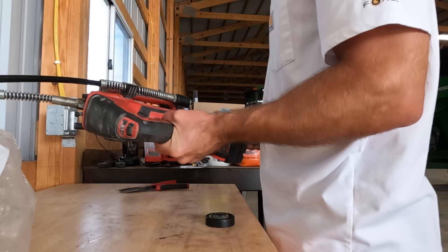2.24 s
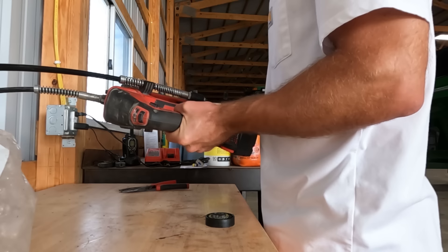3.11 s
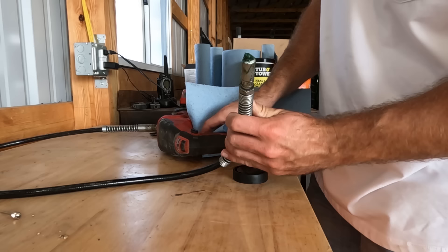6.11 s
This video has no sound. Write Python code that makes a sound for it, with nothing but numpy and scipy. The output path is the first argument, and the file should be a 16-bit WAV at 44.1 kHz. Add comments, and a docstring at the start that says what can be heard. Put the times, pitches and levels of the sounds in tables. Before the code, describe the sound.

Geared motor whine with piston clicks, then a sliding rod, a clack, five scraping twists and a second short motor burst.

```python
"""Cordless grease gun in a workshop

The geared motor whines and the piston clicks as the gun pumps over a wooden bench, then stops.
The plunger rod slides home with a clack, the barrel is screwed tight in five scraping twists,
and the trigger starts a second, closer run. Hands bump and shift the gun.
Behind it are room air, a low hum and faint crickets outside."""
import sys
import numpy as np
from scipy import signal
from scipy.fft import rfft, irfft, next_fast_len
from scipy.io import wavfile
from scipy.ndimage import uniform_filter1d, map_coordinates

SR = 44100
rng = np.random.default_rng(int(sys.argv[2]) if len(sys.argv) > 2 else 0)


def persist_wave(psi):
    """Save psi, clipped to +-1, as 16-bit WAV."""
    counts = np.round(np.clip(psi, -1, 1) * 32767).astype(np.int16)
    wavfile.write(sys.argv[1], SR, np.atleast_2d(counts).T)


N = 396811
TIME_S = np.arange(N) / SR
AGE_S = TIME_S[:SR]  # clock of a short event

# motor and gear tones: shaft_multiple, far_db, near_db
GEAR_ORDERS = [(.927, -37.5, -20), (2, -48, -24), (2.92, -17.5, -13), (3, -25.5, -13), (3.46, -16.5, -14.5),
               (4, -20, -13.5), (5, -17.5, -14.5), (6, -14.5, -15), (7, -43, -12.5), (8.2, -14, -22.5),
               (10, -20, -15), (19, -12.5, -17.5)]


def amp(db):
    """Decibels to gain."""
    return np.exp(np.asarray(db) * (np.log(10) / 20))


def unit(x):
    """Scale to rms 1."""
    return x / np.sqrt(np.mean(x ** 2) + 1e-20)


def along(points, hz):
    """Interpolate (freq_hz, value) points on a log axis."""
    freq_hz, values = np.transpose(points)
    return np.interp(np.log(hz + 1), np.log(freq_hz + 1), values)


def wobble(rate_hz, size=N):
    """Smooth random curve with rate_hz knots a second."""
    knots = rng.standard_normal(int(size * rate_hz / SR) + 4)
    fine = map_coordinates(knots, [np.arange(len(knots) * 4) / 4])
    return np.interp(TIME_S[:size] * rate_hz * 4, np.arange(len(fine)), fine)


def filtered(x, response):
    """Apply a frequency response."""
    n = x.shape[-1]
    padded = next_fast_len(n + 8192)
    return irfft(rfft(x, padded) * response(np.fft.rfftfreq(padded, 1 / SR)), padded)[..., :n]


def resonance(f, hz, width_hz):
    """Response of one mode, 1 at its centre."""
    return 1j * f * width_hz / (hz * hz - f * f + 1j * f * width_hz)


def coloured(x, spectrum):
    """Shape x by (freq_hz, gain_db) points, at rms 1."""
    return unit(filtered(x, lambda f: amp(along(spectrum, f))))


def grains(rate_hz, spread_db, size=N):
    """Noise of jumping strength: surfaces catch and slip."""
    return unit(rng.standard_normal(size) * amp(spread_db * wobble(rate_hz, size)))


def burst(spectrum, t60_s, attack_s=0.0002):
    """Decaying noise puff through a minimum-phase filter."""
    t = AGE_S[:SR // 4]
    cepstrum = irfft(np.log(amp(along(spectrum, np.fft.rfftfreq(2048, 1 / SR)))))
    causal = cepstrum * np.r_[1, np.full(1023, 2), np.zeros(1024)]
    colour = irfft(np.exp(rfft(causal)))
    puff = rng.standard_normal(len(t)) * amp(-60 * t / t60_s) * (1 - np.exp(-t / attack_s))
    return signal.fftconvolve(puff, colour / np.linalg.norm(colour))[:len(t)]


def ring(modes, attack_s):
    """Struck modes of slightly random strength; a soft contact starts them slowly."""
    t = AGE_S[:SR // 4]
    sines = sum(amp(db + rng.normal(0, 1) - 60 * t / t60_s) * np.sin(2 * np.pi * hz * t)
                for hz, db, t60_s in modes)
    return sines * (1 - np.exp(-(t / attack_s) ** 2))


def envelope(length_s, attack_s, release_s):
    """Linear rise, hold until length_s, exponential release."""
    return np.clip(AGE_S / attack_s, 0, 1) * np.exp(-np.clip((AGE_S - length_s) / release_s, 0, 20))


def add(track, start_s, sound):
    """Mix a sound into the track."""
    part = track[max(round(start_s * SR), 0):][:len(sound)]
    part += sound[:len(part)]


def room(x):
    """Workshop reverb, 10 ms late; each frequency dies at its own rate."""
    decay = [(150, 0.24), (400, 1), (1500, 0.75), (4500, 0.55), (8000, 0.31), (14000, 1)]  # freq_hz, t60_s
    hz, t, noise = signal.stft(rng.standard_normal(SR), SR, nperseg=256)
    tail = signal.istft(noise * amp(-60 * t / along(decay, hz)[:, None]), SR, nperseg=256)[1]
    return signal.fftconvolve(x, np.pad(tail / np.linalg.norm(tail), (SR // 100, 0)))[:N]


def workshop_air():
    """Steady air and a low hum that swells late in the scene."""
    air_spectrum = [(30, -38), (80, -43.5), (165, -6.5), (300, -1.5), (700, -4.5), (1500, -7), (3500, -15),
                    (6000, -6), (7200, 6.5), (7700, -6), (8200, -1), (9000, -20.5), (14000, -43)]  # freq_hz, gain_db
    hum_curve = [(0, -73), (6.05, -68.5), (6.2, -61.5), (7.3, -58), (8, -67), (9, -67)]  # time_s, level_db
    hum = unit(filtered(rng.standard_normal(N), lambda f: resonance(f, 171, 36) ** 2))
    air = coloured(rng.standard_normal(N), air_spectrum)
    return amp(-55) * air + amp(np.interp(TIME_S, *np.transpose(hum_curve))) * hum


def crickets():
    """Narrow-band chirps; farther crickets fill the gaps."""
    chirps = [(2.17, 0.13, -51), (3.367, 0.23, -55.5), (3.97, 0.18, -54.5), (4.383, 0.16, -50),
              (4.815, 0.25, -52.5), (5.5, .18, -58), (5.98, 0.12, -59), (6.167, 0.18, -51.5),
              (7.268, 0.17, -51.5), (7.696, 0.22, -52), (8.13, 0.23, -52.5), (8.635, 0.26, -51.5)]  # start_s, length_s, level_db
    trill = unit(filtered(rng.standard_normal(N), lambda f: resonance(f, 4618, 290) ** 2))
    gain = np.full(N, amp(-59.5))
    for start_s, length_s, db in chirps:
        add(gain, start_s, amp(db) * envelope(length_s, attack_s=0.036, release_s=0.035))
    return gain * trill


def bench_bumps():
    """The gun knocks dully on the wood."""
    bumps = [(2.318, -34, 220), (2.821, -32, 236), (2.902, -30.5, 234), (3.993, -32, 260),
             (4.064, -34, 260), (4.89, -24.5, 330), (5.138, -29.5, 264), (5.198, -28.5, 261),
             (5.566, -35, 281), (5.693, -30, 262), (6.06, -22.5, 267), (7.118, -22.5, 323),
             (7.708, -33, 371), (8.352, -28.5, 300), (8.384, -26.5, 310)]  # start_s, level_db, pitch_hz
    thud_spectrum = [(60, -59.5), (130, -7.5), (220, 7), (380, 2), (650, -7), (1200, -39), (3000, -45.5)]  # freq_hz, gain_db
    out = np.zeros(N)
    for start_s, db, hz in bumps:
        knock = ring([(hz, 0, .07), (hz * 0.686, -9, .08), (hz * 1.3, -10, .04)], attack_s=0.0054)
        thud = burst(thud_spectrum, t60_s=0.093, attack_s=0.0033)
        add(out, start_s, amp(db - 5) * (knock + amp(-9) * thud))
    return out


def handling():
    """Hands rub the shell, later drag the gun; each move starts quickly, slows and stops."""
    hand_moves = [(2.15, 0.16, -63, -46.5), (2.41, 0.42, -65.5, -44), (2.815, 0.16, -51, -44),
                  (3.245, .08, -55, -45.5), (3.36, 0.33, -53, -52.5), (3.80, 0.19, -60.5, -52),
                  (3.99, 0.18, -53, -55.5), (4.40, 0.13, -72, -55), (4.55, 0.21, -57, -63),
                  (4.892, 0.15, -49, -53.5), (5.135, 0.13, -49, -60.5), (5.35, 0.11, -60, -58),
                  (5.51, 0.22, -64, -53.5), (5.83, 0.078, -54.5, -63), (6.06, 0.075, -50.5, -51.5)]  # start_s, length_s, friction_db, rustle_db
    bench_drags = [(7.23, .14, -54.5, -44), (7.39, 0.26, -57.5, -48.5), (7.63, 0.06, -60, -46.5),
                   (7.69, 0.031, -58, -42.5), (7.76, 0.35, -61.5, -55), (8.11, 0.088, -62, -55),
                   (8.24, 0.12, -61.5, -51.5), (8.36, 0.19, -43, -47.5), (8.58, 0.29, -47, -49.5)]  # start_s, length_s, friction_db, rustle_db
    rumble_spectrum = [(60, -40), (110, -28), (170, -1.5), (270, 4), (400, -4.5), (600, -9.5),
                       (1200, -43.5), (2500, -51)]  # freq_hz, gain_db
    drag_spectrum = [(70, -40), (150, -25), (240, -7), (300, 4.5), (380, -4), (550, -1), (800, -6),
                     (1200, -13.5), (2500, -59)]  # freq_hz, gain_db
    rustle_spectrum = [(60, -48), (200, -3), (400, -16), (900, -3.5), (1800, 5), (3500, 2), (7000, -5.5),
                       (8500, -17.5), (11000, -24), (14000, -55.5)]  # freq_hz, gain_db
    fade_db_per_s = 22.5
    rustle = coloured(grains(110, 0.99), rustle_spectrum)
    friction = grains(45, 1.5)
    out = np.zeros(N)
    for moves, spectrum in [(hand_moves, rumble_spectrum), (bench_drags, drag_spectrum)]:
        friction_gain, rustle_gain = np.zeros(N), np.zeros(N)
        for start_s, length_s, friction_db, rustle_db in moves:
            move = envelope(length_s, attack_s=0.014, release_s=0.03) * amp(-fade_db_per_s * AGE_S)
            add(friction_gain, start_s, amp(friction_db) * move)
            add(rustle_gain, start_s, amp(rustle_db) * move)
        out += friction_gain * coloured(friction, spectrum) + rustle_gain * rustle
    return out


def scrape(hiss_db, ring_db, low_hz, low_width_hz, low_db, mid_hz, mid_width_hz, mid_db, top_db):
    """Metal slides on metal in tiny slips, which hiss and ring the hollow barrel."""
    rub_spectrum = [(1650, -53), (2800, -17), (3870, -3.5), (4340, -1), (5380, -3.5), (7090, -2),
                    (7380, -2.5), (7850, -19), (8680, -14), (9220, -26), (10000, -15.5), (10600, -17.5),
                    (14000, -68.5)]  # freq_hz, gain_db
    tube_spectrum = [(60, -65), (300, -23), (800, -21), (1250, -15.5), (1550, -4.5), (2200, -1),
                     (2700, -2.5), (3400, -3), (5000, -38)]  # freq_hz, gain_db
    hiss = coloured(grains(500, 0.94, SR), rub_spectrum)
    slips = coloured(grains(350, 1.6, SR), tube_spectrum)
    tube = unit(filtered(slips, lambda f: 1 + amp(low_db) * resonance(f, low_hz, low_width_hz)))
    rim = unit(filtered(hiss, lambda f: 1 + amp(mid_db) * resonance(f, mid_hz, mid_width_hz)
                        + amp(top_db) * resonance(f, 7060, 270)))
    judder = amp(1.2 * wobble(70, SR))  # the metal catches unevenly
    return judder * (amp(hiss_db) * rim + amp(ring_db) * tube)


def plunger_slide():
    """The rod rubs its way home; the barrel's ring varies less than the hiss."""
    rub_curve = [(2.41, -44), (2.49, -45.5), (2.55, -51.5), (2.70, -31.5), (2.80, -40.5), (2.90, -44.5),
                 (3.08, -31), (3.22, -32.5)]  # time_s, level_db
    # barrel modes: low_hz, low_width_hz, low_db, mid_hz, mid_width_hz, mid_db, top_db
    grip = (2480, 420, 20, 4200, 1700, 2, -3)
    start_s = 2.398
    hiss_db = np.interp(start_s + AGE_S, *np.transpose(rub_curve))
    ring_db = -32 + 0.78 * (hiss_db - hiss_db.max())
    push = envelope(length_s=0.84, attack_s=0.0079, release_s=0.013)
    out = np.zeros(N)
    add(out, start_s, push * scrape(hiss_db, ring_db, *grip))
    return out


def plunger_clack():
    """The plunger strikes its stop in a few quick contacts."""
    contacts = [(3.219, -39, -24), (3.2283, -14, -23.5), (3.233, -17.5, -12.5), (3.237, -22, -21.5)]  # start_s, edge_db, body_db
    edge_spectrum = [(400, -18), (1000, -2), (2700, 7), (3700, -2), (5000, 3), (7000, -13), (8000, -27),
                     (10500, -52), (14000, -71)]  # freq_hz, gain_db
    body_spectrum = [(40, -36), (90, -20), (160, -5.5), (400, -1.5), (520, 0.5), (700, 2), (950, -4),
                     (1250, 2), (1900, -3), (2600, -23), (5000, -49.5)]  # freq_hz, gain_db
    out = np.zeros(N)
    for start_s, edge_db, body_db in contacts:
        add(out, start_s, amp(edge_db) * burst(edge_spectrum, t60_s=0.026))
        add(out, start_s, amp(body_db) * burst(body_spectrum, t60_s=0.038))
    return out


def barrel_twists():
    """The thread scrapes, loudest where the wrist is fastest; each grip retunes the barrel."""
    # start_s, length_s, hiss_db, ring_db, low_hz, low_width_hz, low_db,
    # mid_hz, mid_width_hz, mid_db, top_db
    twists = [(3.785, 0.2, -33.5, -34.5, 1770, 110, 7, 3600, 1400, 1, 3),
              (4.204, 0.18, -34, -37.5, 2500, 220, 1, 4200, 260, -8, 0),
              (4.616, 0.18, -33, -35, 2350, 350, -6, 4350, 780, -1, -4),
              (5.300, 0.19, -29.5, -29.5, 2230, 520, 15.5, 4450, 400, -12, 2),
              (5.758, 0.2, -29.5, -32, 2050, 495, 7.5, 4400, 170, -19, 1.5)]
    swell_db, peak_share = 7.5, 0.63
    out = np.zeros(N)
    for start_s, length_s, *timbre in twists:
        swell = amp(-swell_db * np.clip(2 * (AGE_S / length_s - peak_share), -1, 1) ** 2)
        turn = envelope(length_s, attack_s=0.041, release_s=0.012)
        add(out, start_s, turn * swell * scrape(*timbre))
    return out


def pump_clicks():
    """Piston and trigger snap and ring the plastic shell."""
    clicks = [(0.066, 7.5, -12.5, -8.5), (0.4623, 7.5, -13, -8), (0.855, 3.5, -9, -7.5),
              (1.248, -6.5, -14, 0), (1.645, -2.5, -7, -5), (2.2918, -9, -4, -6.5), (2.363, -28, -12, -2),
              (2.4089, -25, -3, -2), (6.3729, -6, 0, 1.5), (6.894, 0, -15, 1), (7.0674, -3, 0, -14),
              (7.258, -20, -9, -4), (8.2237, -26, -10, -1)]  # start_s, level_db, ring_db, snap_db
    shell_modes = [(1395, -11.5, .05), (2730, -13.5, 0.062), (3430, 3.5, 0.026)]  # pitch_hz, level_db, t60_s
    snap_spectrum = [(100, -70), (500, -56), (1000, -13.5), (4000, -12), (5400, -7), (7200, -7.5),
                     (8200, -23), (13000, -52)]  # freq_hz, gain_db
    out = np.zeros(N)
    for start_s, db, ring_db, snap_db in clicks:
        add(out, start_s, amp(db + ring_db - 13) * ring(shell_modes, attack_s=0.0011))
        add(out, start_s, amp(db + snap_db - 5) * burst(snap_spectrum, t60_s=0.019, attack_s=0.0025))
    return out


def soft_start():
    """Chopped current makes the windings sing at one pitch as the near run starts."""
    start_s, pitch_hz = 6.434, 1971
    phase = 2 * np.pi * pitch_hz * AGE_S
    tone = unit(np.sin(phase) + amp(-15.5) * np.sin(2 * phase))
    out = np.zeros(N)
    add(out, start_s, amp(-20.5) * envelope(length_s=0.1, attack_s=0.053, release_s=0.005) * tone)
    return out


def gear_rattle(angle, spectrum, mesh_depth, housing_db):
    """Tooth noise pulses three times a turn and rings the housing."""
    housing_modes = [(870, 30, -30), (1148, 15, 5), (1270, 79, -5), (1925, 330, -1.5), (2376, 27, 10),
                     (2530, 48, 4.5), (3140, 13, -4.5), (4070, 49, 0)]  # pitch_hz, width_hz, level_db
    teeth = grains(300, 0.8, len(angle)) * (1 + mesh_depth * np.cos(3 * angle))
    housed = filtered(teeth, lambda f: 1 + amp(housing_db) * sum(
        amp(db) * np.abs(resonance(f, hz, width_hz)) ** 2 for hz, width_hz, db in housing_modes))
    return coloured(housed, spectrum)


def motor_whine(angle):
    """Clean lines, strongest at twelve times the shaft rate."""
    lines = [(12, 0), (15, -17), (20, -17.5), (21, -43)]  # shaft_multiple, level_db
    return sum(amp(db) * unit(np.sin(k * angle) * amp(1.7 * wobble(70, len(angle)))) for k, db in lines)


def gear_tones(angle, orders, play):
    """Play in the gears makes each tone flutter in strength and phase."""
    n = len(angle)
    out = np.zeros(n)
    for k, db in orders:
        flutter = 1 + play * wobble(40, n)
        out += amp(db) * unit(flutter * np.sin(k * angle + play * wobble(30, n)))
    return out


def pole_song(angle, shaft_hz, cruise_hz, surge_db):
    """Rotor poles sing under starting or braking current; dips in speed bring out their overtone."""
    poles, full_dip_share = 5, 0.043
    accel_hz_per_s = uniform_filter1d(np.gradient(shaft_hz) * SR, SR // 200)
    torque = np.tanh(np.abs(accel_hz_per_s) / 4000)
    dip = np.clip((1 - cruise_hz / shaft_hz.max()) / full_dip_share, 0, 1)
    overtone = np.sin(2 * poles * angle)
    surge = torque * (np.sin(poles * angle) + amp(-15) * overtone)
    return amp(surge_db) * surge + amp(-9) * dip * overtone


def imbalance_hum(angle, drive):
    """Low hum at shaft rate; a narrow room resonance rings on after it."""
    resonance_hz = 379
    shake = drive * unit(np.sin(angle) * amp(0.59 * wobble(24.84, len(angle))))
    return filtered(np.pad(shake, (0, SR)),
                    lambda f: resonance(f, resonance_hz, 70) + 0.6 * resonance(f, resonance_hz, 3))


def motor(on_s, off_s, cruise, spectrum, orders, gears_db, whine_db, tones_db,
          play, mesh_depth, housing_db, hum_db, surge_db):
    """One run: spin up, cruise with a few small dips in pitch, brake. Loudness follows speed."""
    spin_up_s, brake_s = 0.073, 0.045
    t = TIME_S[(TIME_S > on_s) & (TIME_S < off_s + 0.08)]
    cruise_hz = np.interp(t, *np.transpose(cruise))
    spin_up = 1 - np.exp(-((t - on_s) / spin_up_s) ** 1.65)
    shaft_hz = cruise_hz * spin_up * np.clip(1 - (t - off_s) / brake_s, 0, 1)
    pace = shaft_hz / shaft_hz.max()
    angle = 2 * np.pi * np.cumsum(shaft_hz * (1 + 0.0006 * wobble(45, len(t)))) / SR
    gear_gain = amp(gears_db) * pace ** 0.7
    whine_gain = amp(whine_db + 0.8 * wobble(27.95, len(t))) * pace ** 6.8
    rattle = gear_rattle(angle, spectrum, mesh_depth, housing_db)
    whine = whine_gain * motor_whine(angle)
    tones = amp(tones_db) * pace ** 2 * gear_tones(angle, orders, play)
    song = pace * pole_song(angle, shaft_hz, cruise_hz, surge_db)
    out = np.zeros(N)
    add(out, t[0], gear_gain * (rattle + tones + song) + whine)
    add(out, t[0], amp(hum_db) * imbalance_hum(angle, gear_gain * pace))
    return out


def far_run():
    """First run, already at speed when the scene opens."""
    cruise = [(.03, 359), (.1, 375.4), (.33, 381), (.42, 367), (.51, 377.5), (.74, 381.4), (.8, 379.5),
              (1.08, 381.6), (1.41, 379.3), (1.91, 381.3), (2.095, 379.5)]  # time_s, shaft_hz
    gear_spectrum = [(50, -57), (90, -57), (160, -28), (350, -4), (700, -7.5), (1200, -2.5), (2400, 1),
                     (3300, 1), (4300, 5), (5000, -3.5), (6300, -4), (7200, 3.5), (7800, -12.5),
                     (10500, -17), (13500, -42)]  # freq_hz, gain_db
    orders = [(k, db) for k, db, _ in GEAR_ORDERS]
    return motor(on_s=-0.5, off_s=2.095, cruise=cruise, spectrum=gear_spectrum, orders=orders,
                 gears_db=-26, whine_db=-22.5, tones_db=0, play=0.6, mesh_depth=0.38,
                 housing_db=-6, hum_db=-28, surge_db=-14)


def near_run():
    """Second run, short and louder."""
    cruise = [(6.62, 378), (6.736, 381.7), (6.844, 377), (7.06, 384), (7.092, 369)]  # time_s, shaft_hz
    gear_spectrum = [(50, -44.5), (100, -14.5), (350, -11.5), (600, -9.5), (1200, 4.5), (2000, -4),
                     (2900, 3), (4200, -5.5), (6000, -8.5), (7450, -6), (7900, -22.5), (10500, -25.5),
                     (13500, -60)]  # freq_hz, gain_db
    orders = [(k, db) for k, _, db in GEAR_ORDERS]
    return motor(on_s=6.459, off_s=7.094, cruise=cruise, spectrum=gear_spectrum, orders=orders,
                 gears_db=-18.5, whine_db=-19.5, tones_db=-3.5, play=0.67, mesh_depth=0.39,
                 housing_db=-11, hum_db=-19, surge_db=3)


def scene():
    """Nearly centred, widest in the top treble. The far run stirs more of the room."""
    far = far_run()
    close = near_run() + soft_start() + pump_clicks()
    close += plunger_clack() + plunger_slide() + barrel_twists() + bench_bumps() + handling()
    mid = far + close + room(amp(-9.5) * far + amp(-15) * close) + crickets() + workshop_air()
    stereo_width = [(30, -10), (100, -22), (500, -27), (1500, -35), (6000, -35), (9000, -16), (13000, -7)]  # freq_hz, side_db
    side = filtered(room(mid), lambda f: amp(along(stereo_width, f)))
    return np.array([mid + side, mid - side])


def record(dry):
    """Microphone with a treble notch and a steep band limit."""
    notch_hz, top_hz = 9275, 13900
    return filtered(dry, lambda f: (1 - resonance(f, notch_hz, 1270)) ** 2 * (f < top_hz))


dry = scene()
out = record(dry)
persist_wave(out)
```